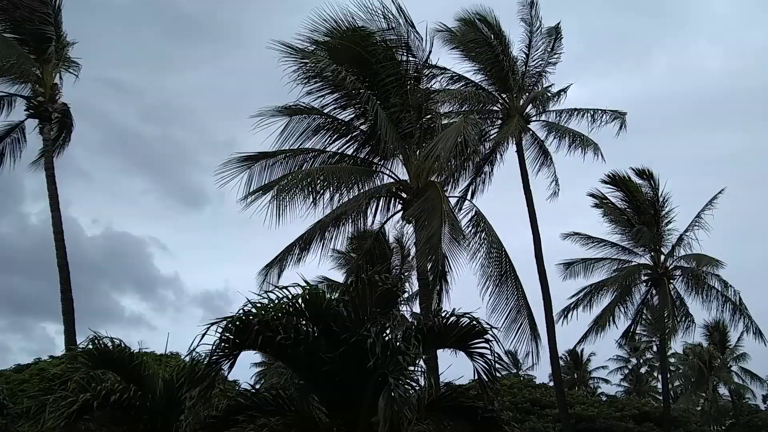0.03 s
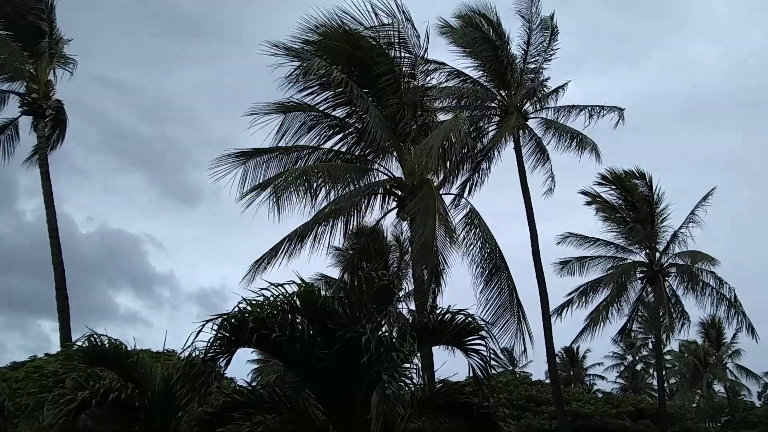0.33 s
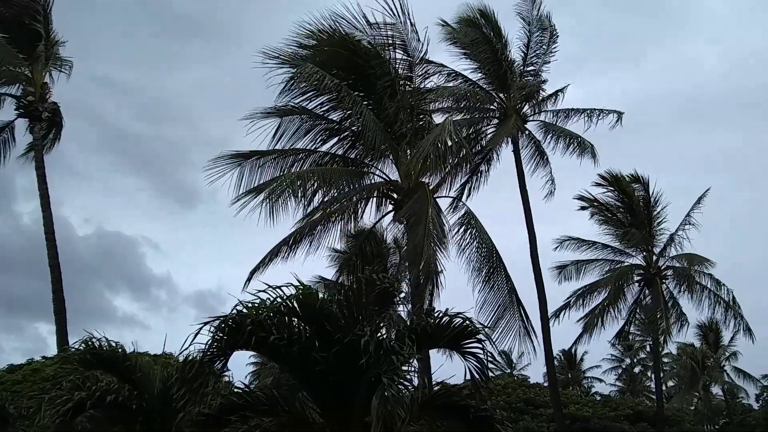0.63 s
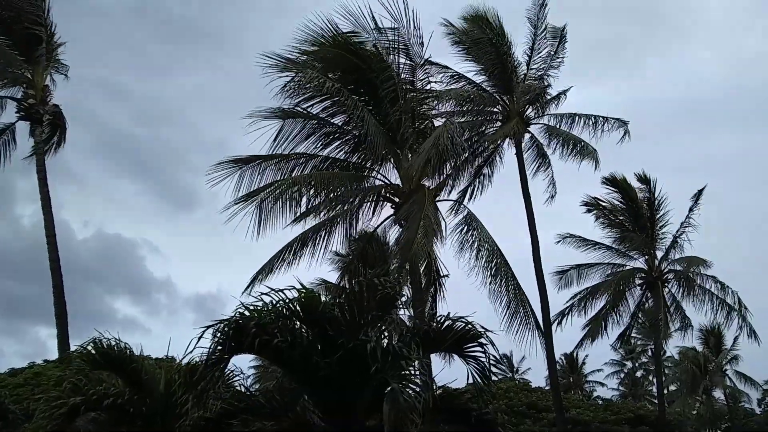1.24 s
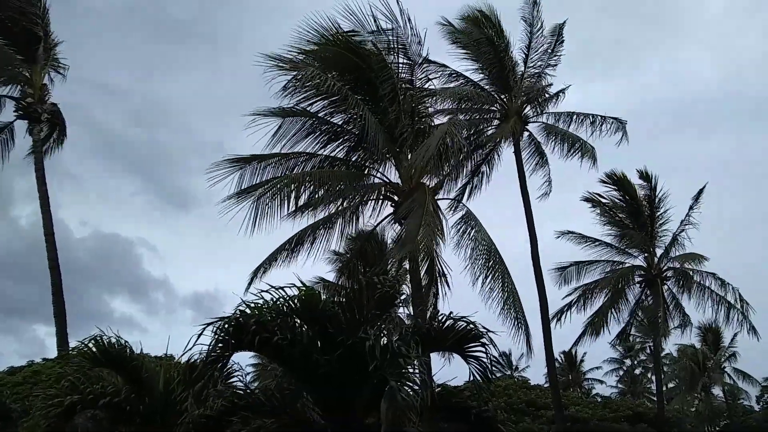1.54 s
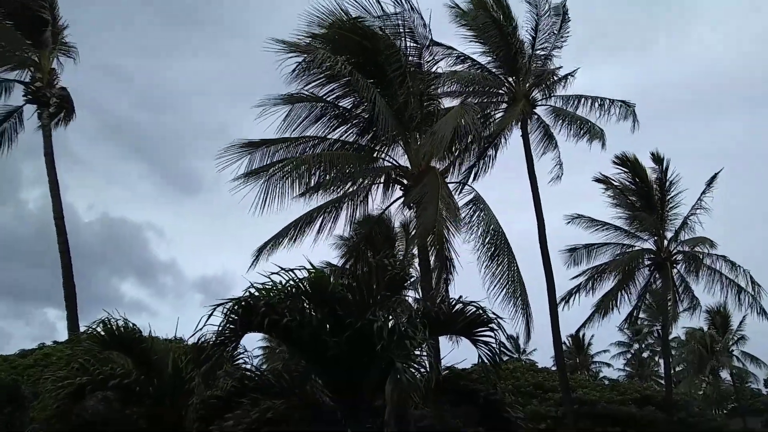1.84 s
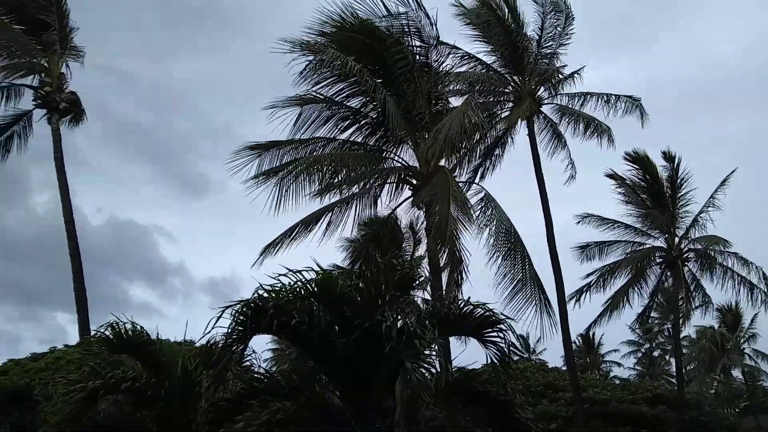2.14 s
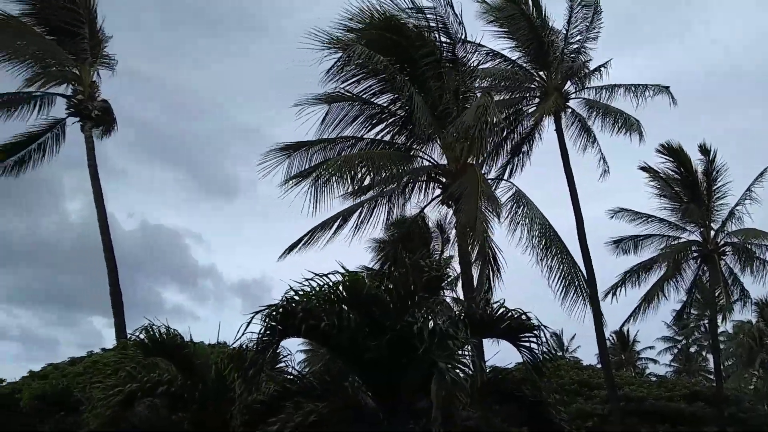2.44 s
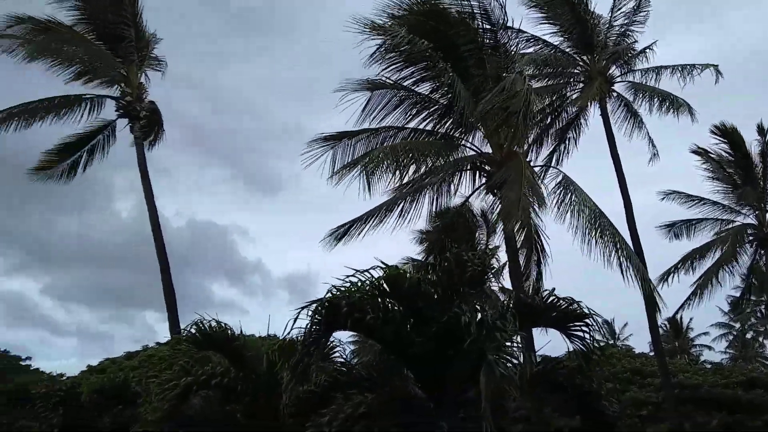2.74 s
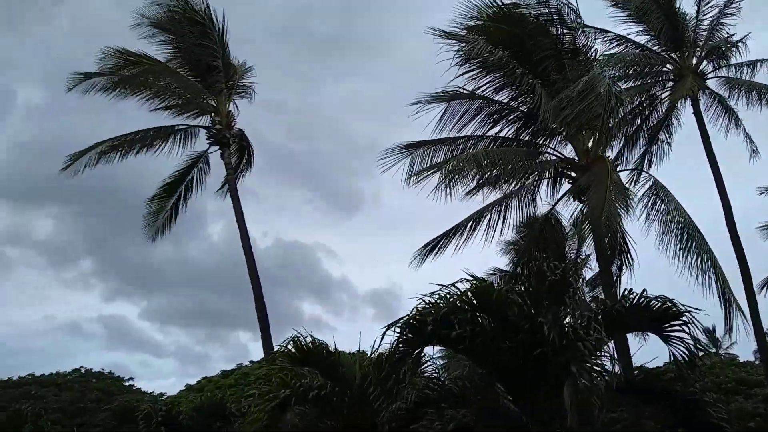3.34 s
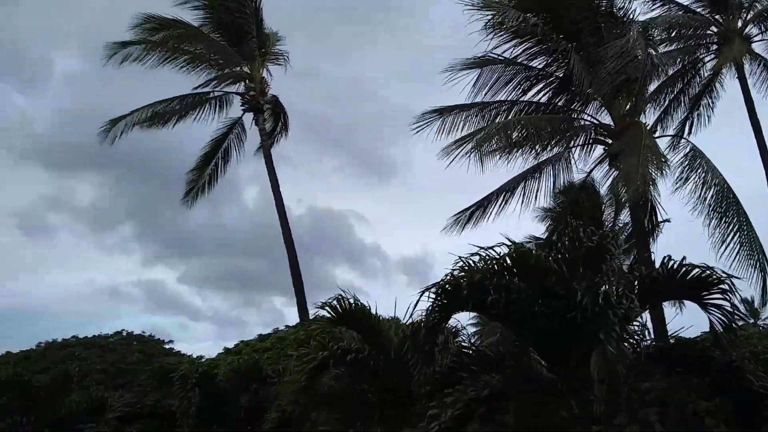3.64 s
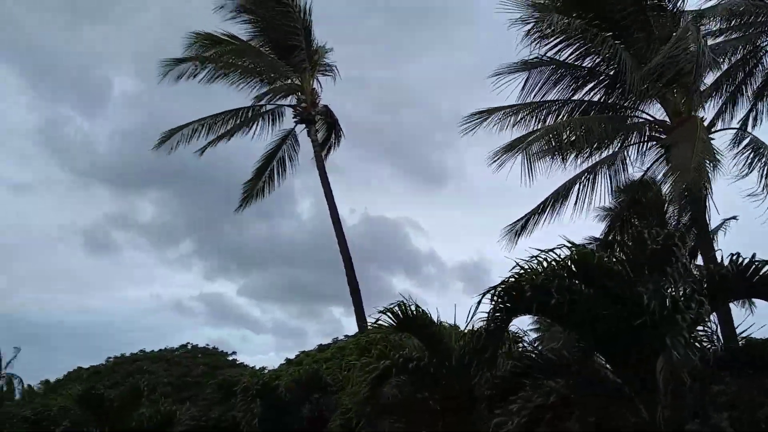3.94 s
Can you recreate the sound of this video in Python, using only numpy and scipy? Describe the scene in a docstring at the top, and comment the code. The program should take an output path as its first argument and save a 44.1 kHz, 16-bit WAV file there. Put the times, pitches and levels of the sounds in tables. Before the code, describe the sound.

Strong wind fades in and blows on through palm trees, its roar and leafy hiss spread wide around the microphone, with soft moans and a faint hum. Late on, a quick dry double snap sounds nearby on the right.

```python
"""A camera fades in over the first half second, widening the picture of its two close microphones.
Strong wind is already rushing steadily through tall palms: a low roar, a hiss of leaflets tapping
each other, and a faint hum underneath. Hollow moans swell and sink as the wind passes.
At about 3.4 s something close by on the right gives a dry double snap, and the wind blows on."""
import sys
import numpy as np
from scipy import signal
from scipy.fft import rfft, irfft
from scipy.io import wavfile
from scipy.ndimage import uniform_filter1d

SR = 44100
rng = np.random.default_rng(int(sys.argv[2]) if len(sys.argv) > 2 else 0)


def to_wav(sig):
    """Store sig (one row per channel, or 1-D mono) as 16-bit WAV at the path in sys.argv[1].

    Samples outside -1..1 are clipped; the rate is SR.
    """
    pcm = np.clip(np.atleast_2d(sig), -1, 1) * 32767
    pcm = np.round(pcm).astype(np.int16)
    wavfile.write(sys.argv[1], SR, pcm.T)  # frames by channels


N = 176400
TIME, FREQS = np.arange(N) / SR, np.fft.rfftfreq(N, 1 / SR)


def amp(db):
    """Decibels to gain."""
    return 10 ** (np.asarray(db) / 20)


def unit_rms(x):
    """Scales a signal to rms 1."""
    return x / np.sqrt(np.mean(x ** 2) + 1e-20)


def curve_at(points, hz):
    """Reads a curve on a log-frequency axis."""
    f, value = np.transpose(points)
    return np.interp(np.log(hz + 1), np.log(f + 1), value)


# How alike the two sides are (frequency [Hz], coherence [0-1])
AIR_COHERENCE = [(20, 0.37), (60, 0), (110, 1), (220, 0.42), (450, 0.52), (700, 0.6), (950, 0.45),
                 (1300, 0), (3000, 0.013), (14000, 0)]
# Phase between the sides, also for hum and moans (frequency [Hz], left lead [rad])
PHASE_LEAD = [(20, 2.5), (70, 2.5), (110, 1.35), (220, 0.65), (450, 0.34), (900, -0.3), (2000, 0)]
# Where the wind sits in the picture (frequency [Hz], left minus right [dB])
AIR_PAN = [(40, 0), (110, 0), (200, 1.5), (400, .5), (700, 2.5), (2300, -1.5), (5000, -0.5), (7700, 2),
           (11000, 5), (13000, 0.5)]
def air_noise():
    """Left and right spectra of white noise, partly shared by the two close microphones."""
    shared, separate = rfft(rng.standard_normal((2, N)))
    coherence = curve_at(AIR_COHERENCE, FREQS)
    right = coherence * shared + np.sqrt(1 - coherence ** 2) * separate
    right *= np.exp(-1j * curve_at(PHASE_LEAD, FREQS))
    pan_db = curve_at(AIR_PAN, FREQS)
    return np.array([shared * amp(pan_db / 2), right * amp(-pan_db / 2)])


# Tone of the wind in the crowns, roar up to hiss (frequency [Hz], density [dB per Hz])
WIND_SPECTRUM = [(20, -97), (45, -85.5), (75, -79.5), (105, -73), (180, -69), (430, -71), (700, -74),
                 (980, -76), (1200, -81), (1900, -84), (2600, -85.5), (3300, -86.5), (4200, -86),
                 (4900, -87), (5700, -91), (7500, -87.5), (8900, -91), (11000, -87.5), (12000, -91),
                 (13800, -101)]
# Gentle ride on the wind's strength (time [s], gain [dB])
GUST_RIDE = [(0, -0.5), (.7, 0.1), (1.2, 0.1), (2.2, 0.26), (2.6, 0.1), (3.0, 0), (4, 0.5)]
def wind_rush():
    """Roar and hiss follow the gust; swaying fronds add patches of colour and a quick flutter."""
    patch_db, flutter_db = 1.04, 0.51
    steady = irfft(air_noise() * amp(curve_at(WIND_SPECTRUM, FREQS)), N) * np.sqrt(SR / 2)
    hz, t, bands = signal.stft(steady, SR, nperseg=512, noverlap=384)
    patches = rng.standard_normal((len(t), len(hz)))
    patches = uniform_filter1d(patches, size=30, axis=0)  # about 90 ms long
    patches = unit_rms(uniform_filter1d(patches, size=7, axis=1)).T  # about 600 Hz wide
    flutter = unit_rms(uniform_filter1d(rng.standard_normal(len(t)), size=12))
    gust_db = np.interp(t, *np.transpose(GUST_RIDE))
    bands *= amp(gust_db + patch_db * patches + flutter_db * flutter)
    return signal.istft(bands, SR, nperseg=512, noverlap=384)[1][:, :N]


def leaflet_taps():
    """Leaflets knock together on either side: a dense, bright patter of uneven size."""
    taps_per_s, level_db, spread_db = 810, -66, 8
    size = amp(spread_db * np.minimum(rng.exponential(1, (2, N)), 4))
    polarity = rng.choice([-1, 1], (2, N))
    taps = size * polarity * (rng.random((2, N)) < taps_per_s / SR)
    band = signal.butter(2, [2920, 11500], "band", fs=SR, output="sos")
    return amp(level_db) * unit_rms(signal.sosfilt(band, taps))


def centre_notch(stereo):
    """Scoops a steep, narrow hollow between roar and hiss out of the middle of the picture."""
    centre_hz, half_width_hz, depth_db = 2299, 192, -28
    inside = 1 / (1 + ((FREQS - centre_hz) / half_width_hz) ** 8)
    mid = rfft(stereo.mean(0))
    return stereo + irfft(mid * (amp(depth_db * inside) - 1), N)


def wavering_tone(hz, wander_hz, waver_db, rate_hz):
    """A sine at both microphones whose pitch and level drift at random."""
    slow_noise = rfft(rng.standard_normal((2, N))) / (1 + (FREQS / rate_hz) ** 2)
    pitch_drift, level_drift = (unit_rms(irfft(spectrum, N)) for spectrum in slow_noise)
    phase = 2 * np.pi * np.cumsum(hz + wander_hz * pitch_drift) / SR
    pair = np.sin([phase, phase - curve_at(PHASE_LEAD, hz)])
    return unit_rms(amp(waver_db * level_drift) * pair)


# The hum's two notes (pitch [Hz], wander [Hz], level [dB])
HUM_TONES = [(100.8, 3.58, -57), (119.5, 3.5, -51)]
# The hum sinks and returns (time [s], relative level [dB])
HUM_RIDE = [(.3, -5), (.65, -0.5), (1.35, 0), (1.6, -4), (2.3, -1), (2.45, -5), (2.7, -7), (2.84, 3.5),
            (3.05, -2.5), (3.42, -1), (3.58, -2.5), (4, -2)]
def hum():
    """A faint bed of low tones wavers under the wind."""
    ride = unit_rms(amp(np.interp(TIME, *np.transpose(HUM_RIDE))))
    return ride * sum(amp(db) * wavering_tone(hz, wander_hz, waver_db=2, rate_hz=5.98)
                      for hz, wander_hz, db in HUM_TONES)


# Hollow wind voices (pitch [Hz], wander [Hz], crest level [dB], crest time [s], half-length [s])
MOAN_SWELLS = [(159, 5.2, -51, 3.52, .12), (194.5, 8.8, -48, .49, 0.092), (199, 4, -54.5, 1.54, 0.78),
               (309.2, 2.56, -50.5, 3.74, 0.87), (306.8, 3.07, -49.5, 2.12, 0.37),
               (350.6, 2.84, -57.5, 2.5, 1.7), (531, 6.03, -57.5, 3, 2.7), (574, 3.2, -48.5, 2.22, 0.21),
               (571, 3.94, -52, 2.1, 1.05), (656, 2.59, -58.5, 3.05, 1.24), (1628, 15, -69.5, 2.7, 0.39)]
def wind_moans():
    """Hollow tones rise and sink as the wind passes, just left of centre."""
    pan_db = 1
    voices = 0
    for hz, wander_hz, db, crest_s, half_length_s in MOAN_SWELLS:
        swell = 1 / np.sqrt(1 + ((TIME - crest_s) / half_length_s) ** 4)
        voices += amp(db) * swell * wavering_tone(hz, wander_hz, waver_db=2, rate_hz=5.87)
    return voices * amp([[pan_db / 2], [-pan_db / 2]])


# Two hard cracks among three soft ones (time [s], level [dB], brightness tilt [dB per octave])
SNAP_CRACKS = [(3.4157, -32, 0), (3.41955, -15.2, 0), (3.42275, -15.7, 0), (3.4245, -27.5, 9),
               (3.4262, -29, 0)]
# The dry ring of each crack (frequency [Hz], relative level [dB], time to fall 60 dB [s])
SNAP_RING = [(2300, -13, 0.003), (3400, -2, 0.0026), (4100, -7, 0.003), (5900, -6, 0.0028),
             (8200, -18, .0015), (12500, -13, .001)]
def dry_snap():
    """Quick cracks on the right ring a few short modes and scatter briefly."""
    pivot_hz, tail_db, tail_t60_s = 3420, -21, 0.04
    left_db, left_lag_s = -7.5, 0.000366
    t = TIME[:SR // 10]
    band = signal.butter(2, [2180, 12000], "band", fs=SR, output="sos")
    cracks = 0
    for onset_s, level_db, tilt in SNAP_CRACKS:
        ring = sum(amp(db + tilt * np.log2(hz / pivot_hz) - 60 * t / t60) * np.sin(2 * np.pi * hz * t)
                   for hz, db, t60 in SNAP_RING)
        ring = signal.sosfilt(band, ring)
        scatter = signal.fftconvolve(rng.standard_normal((2, len(t))), ring[None], axes=1)
        tail = unit_rms(scatter[:, :len(t)]) * amp(tail_db - 60 * t / tail_t60_s)
        cracks += amp(level_db) * rfft(ring + tail, N) * np.exp(-2j * np.pi * FREQS * onset_s)
    left, right = cracks
    left = left * amp(left_db) * np.exp(-2j * np.pi * FREQS * left_lag_s)
    return irfft(np.array([left, right]), N)


def scene():
    """Wind and leaflet patter with a narrow hollow near 2.3 kHz, plus moans, hum and a dry snap."""
    return centre_notch(wind_rush() + leaflet_taps()) + wind_moans() + hum() + dry_snap()


# Opening fade, silent before its first point (time [s], gain [dB])
FADE_RIDE = [(.079, -20), (.13, -9), (.18, -6), (.27, -2), (.48, 1)]
# Width by band (frequency [Hz], share of the opposite side subtracted [0-1])
WIDTH_CROSSFEED = [(450, 0.0049), (1100, 0.85), (2300, 0.73), (3400, 0.76), (4500, 0.75), (6000, 0.37),
                   (9000, 0.12), (12000, 0.34)]
def record(dry):
    """The camera widens the picture with delayed, inverted crossfeed, fades in and trims the top."""
    delay_s, cutoff_hz = 1 / 2260, 14250
    sides = rfft(dry)
    share = curve_at(WIDTH_CROSSFEED, FREQS)
    crossfeed = share * np.exp(-2j * np.pi * FREQS * delay_s) * sides[::-1]
    wide = irfft((sides - crossfeed) / np.sqrt(1 + share ** 2), N)
    fade = amp(np.interp(TIME, *np.transpose(FADE_RIDE))) * (TIME >= FADE_RIDE[0][0])
    lowpass = signal.firwin(1023, cutoff_hz, window=("kaiser", 9), fs=SR)
    return signal.oaconvolve(wide * fade, lowpass[None], "same")


dry = scene()
out = record(dry)
to_wav(out)
```